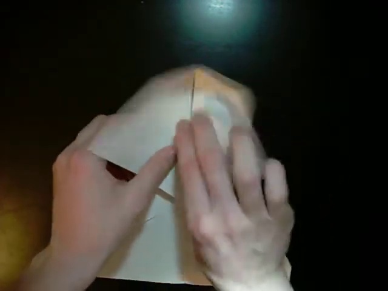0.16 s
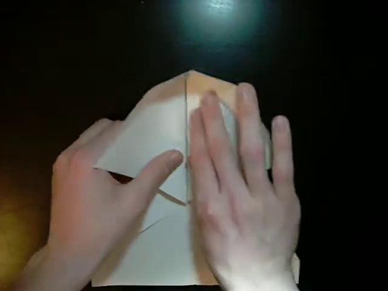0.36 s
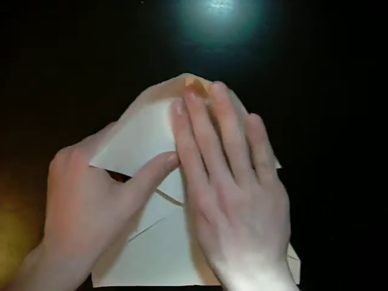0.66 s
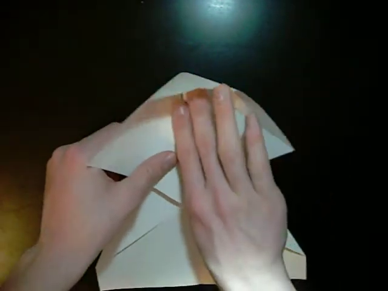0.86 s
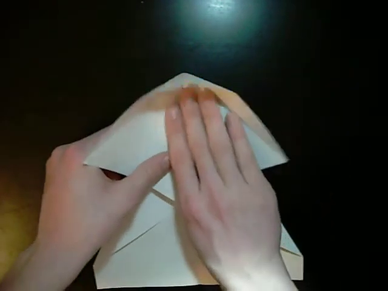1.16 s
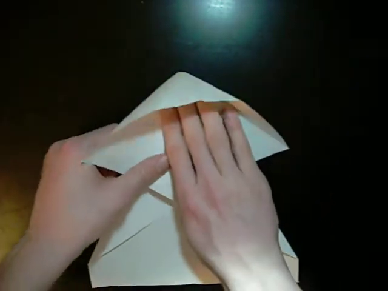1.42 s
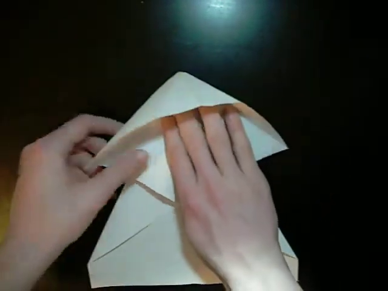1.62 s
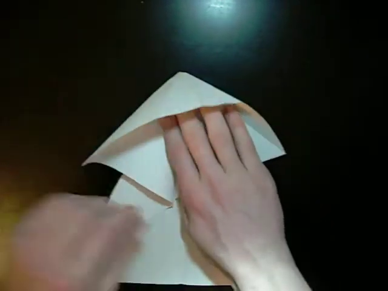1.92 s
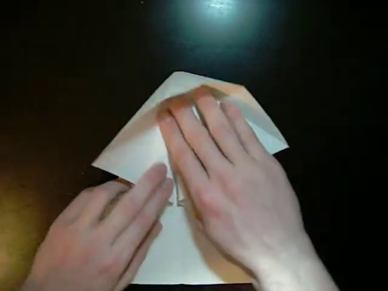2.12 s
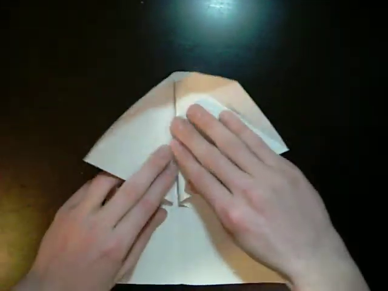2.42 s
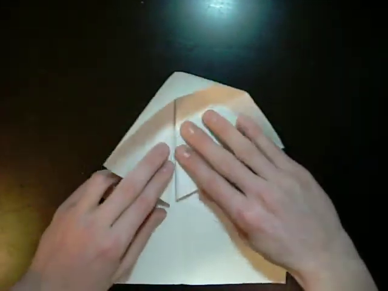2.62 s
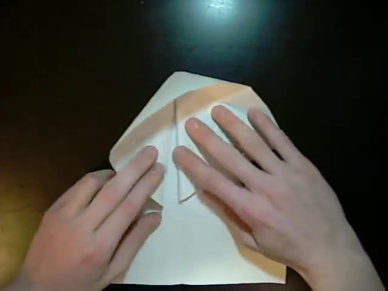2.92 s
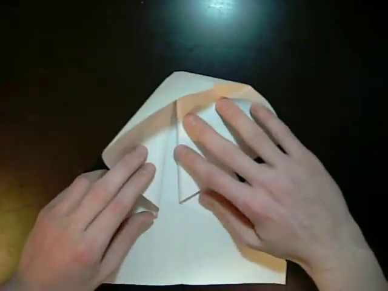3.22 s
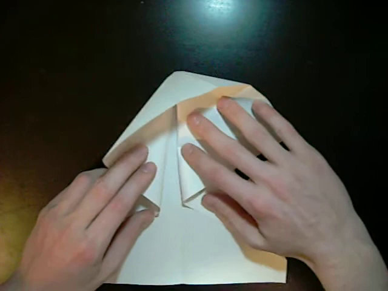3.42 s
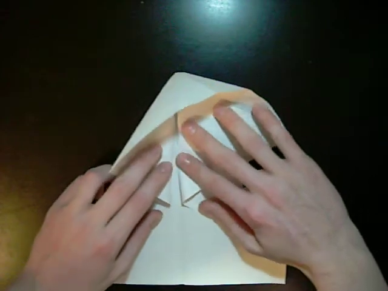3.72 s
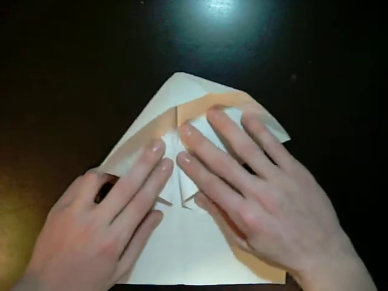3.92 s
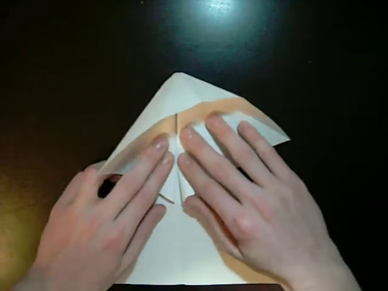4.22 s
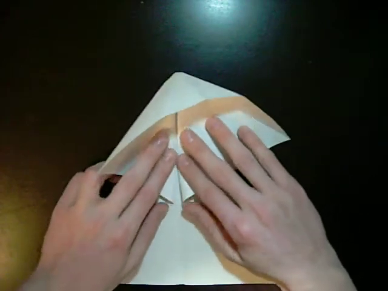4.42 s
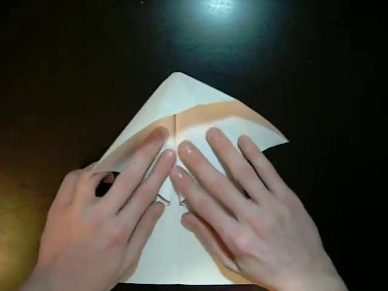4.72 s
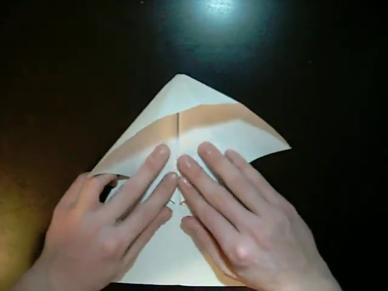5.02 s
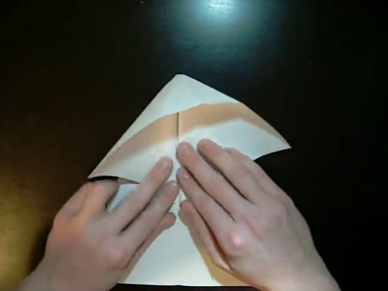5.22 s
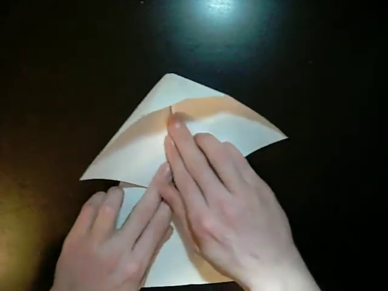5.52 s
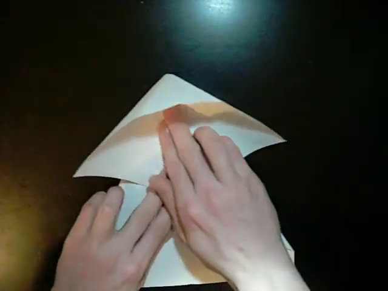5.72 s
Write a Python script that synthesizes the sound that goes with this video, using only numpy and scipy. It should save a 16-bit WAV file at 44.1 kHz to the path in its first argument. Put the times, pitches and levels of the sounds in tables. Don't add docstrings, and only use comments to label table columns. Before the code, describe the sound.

A stiff paper sheet is folded by hand on a table, heard very close through a small microphone with no high treble. It opens with a short scrape and rub; at 0.13-0.2 s the fold drags and a panel pops. Light crackles follow from 0.4 s, thickening into a cluster at 0.9-1.0 s. At about 1.38 s a very loud, clipped crack lands with a dull table knock, and a second harsh snap comes at 1.58 s amid smaller crackles. From 1.7 to 3.5 s there is mostly soft, grainy finger rustling in uneven strokes, with modest snaps near 2.04 and 2.9 s. Crisp cracks return at 3.65 s and 3.97-4.04 s, then quieter rubbing, with a small pop at 4.5 s. A final flurry of crackles comes at 5.6-5.85 s. Brief table and wall reflections follow the snaps; faint, wavering 30-per-second electric buzz and steady hiss lie underneath.

```python
import sys
import numpy as np
from scipy import signal
from scipy.fft import rfft, irfft
from scipy.io import wavfile

SR = 44100
rng = np.random.default_rng(int(sys.argv[2]) if len(sys.argv) > 2 else 0)


def generate_wav(signal):
    frames = np.transpose(np.atleast_2d(signal))
    scaled = np.clip(frames, -1, 1) * 32767
    pcm = np.round(scaled).astype(np.int16)
    wavfile.write(sys.argv[1], SR, pcm)


def amplitude_ratio(level_db):
    exponent = np.asarray(level_db, float) / 20
    return 10 ** exponent


N = 258426
BURST_T = np.arange(4096) / SR


def evened(x):
    return x / np.sqrt(np.mean(x ** 2) + 1e-20)


def colour(x, points):
    f, db = np.transpose(points)
    hz = abs(np.fft.fftfreq(4096, 1 / SR))
    gain_db = np.interp(np.log(hz + 1), np.log(f + 1), db)
    log_gain = np.log(amplitude_ratio(np.maximum(gain_db, -70)))
    phase = -signal.hilbert(log_gain).imag
    taps = np.fft.ifft(np.exp(log_gain + 1j * phase)).real[:2048]
    return signal.oaconvolve(x, taps)[:len(x)]


def resonate(x, hz, width):
    turn = np.exp(2j * np.pi * np.cumsum(hz * np.ones(len(x))) / SR)
    r = np.exp(-np.pi * width / SR)
    return 2 * (turn * signal.lfilter([1 - r], [1, -r], x / turn)).real


def slow(hz):
    spectrum = rfft(rng.standard_normal(N))
    return evened(irfft(spectrum / (1 + (np.fft.rfftfreq(N, 1 / SR) / hz) ** 2), N))


def narrow(x):
    return signal.oaconvolve(x, signal.firwin(501, 4406, window=("kaiser", 11), fs=SR), "same")


# [freq_hz, level_db_per_hz]
SHEET = [(290, -49.5), (500, -26), (549, -23.5), (940, -28), (1290, -14), (1450, -9.5), (2230, -5),
         (2420, -2), (3680, -0.5), (4110, -6.5), (4600, -31.5), (5980, -71), (10100, -120)]
# [freq_hz, level_db]
LOWER = [(150, -37.5), (400, -12.5), (800, -12.5), (1300, -5.5), (1800, -5.5), (2400, -6), (4000, -38)]


def crackle(volley, hz, low_hz, low_db):
    crack = evened(colour(volley, SHEET))
    crack = crack + evened(resonate(crack, hz, 546.4))
    body = evened(colour(volley, LOWER))
    large_panel = resonate(resonate(volley, low_hz, 480), low_hz, 1000)
    body = evened(.85 * body + evened(large_panel))
    return narrow(evened(crack) + amplitude_ratio(low_db) * body)


def snap(peak_db, hz, length, low_hz, low_db):
    noise = rng.standard_normal(len(BURST_T))
    rise = 1 - np.exp(-BURST_T / .001)
    shape = rise * np.exp(-2.2 * (BURST_T / min(length, .02)) ** 2.4)
    sound = crackle(noise * abs(noise) ** 1.7 * shape, hz, low_hz, low_db + 5.5)
    return amplitude_ratio(peak_db) * sound / abs(sound).max()


def place(events):
    out = np.zeros(N + len(BURST_T))
    for start, sound in events:
        out[round(start * SR):][:len(BURST_T)] += sound
    return out[:N]


# [time_s, peak_db, ring_hz, length_s]
CREASES = [(0.648, -24.5, 2500, 0.0041), (0.82, -26, 3030, 0.0027), (.896, -31, 3150, 0.0095),
           (1.103, -40, 3920, 0.004), (1.3771, 0.4, 2370, .008), (1.398, -18, 3100, 0.0096),
           (1.5095, -21.5, 3290, 0.0071), (1.58, -1.6, 3066, 0.0033), (1.6, -34, 2940, 0.0057),
           (1.582, -16.5, 3100, 0.0074), (1.633, -27, 3050, 0.0024), (1.72, -28, 3070, 0.021),
           (2.04, -19, 2510, 0.0078), (2.17, -27, 2780, .0039), (2.459, -31.5, 2820, 0.0065),
           (2.893, -18, 2670, 0.0055), (3.002, -31.5, 3680, .0069), (3.284, -32.5, 3240, 0.0065),
           (3.31, -37, 3160, 0.007), (3.385, -33.5, 3820, 0.0093), (3.653, -8.5, 3230, 0.0068),
           (3.903, -40, 3650, 0.005), (3.969, -4.5, 3370, 0.012), (4.012, -9, 2820, 0.0055),
           (4.042, -18.5, 3300, 0.0046), (4.159, -34.5, 3330, 0.0052), (4.284, -30.5, 3940, 0.0029),
           (4.482, -28, 3640, 0.012), (5.618, -33, 3680, .0048), (5.694, -17, 2670, 0.007)]


def creases():
    return place((s - .001, snap(db, hz, length, low_hz=2000, low_db=-24))
                 for s, db, hz, length in CREASES)


# [time_s, peak_db, length_s, low_ring_hz, low_ring_db]
BUCKLES = [(.1982, -11, 0.0058, 2250, -9.5), (0.405, -24, 0.0072, 1740, -13),
           (.546, -24.5, 0.0073, 2290, -9), (0.889, -28.5, 0.005, 2220, -6),
           (0.931, -13.5, 0.0074, 1530, -8.5), (0.953, -14.5, 0.0079, 1930, -4),
           (.964, -25.5, 0.0079, 1695, -4), (0.993, -30.5, 0.013, 2100, -5),
           (1.302, -26.5, .0053, 1320, -2), (1.3819, -5, 0.0047, 2240, -11.5),
           (1.388, -15.5, 0.0047, 2300, -6), (1.459, -21.5, 0.007, 2410, 2),
           (1.547, -27, 0.0047, 2280, -16), (1.5815, -5.5, 0.0035, 1714, -4), (1.5902, -20, .0042, 993, -2),
           (2.517, -28, 0.01, 1590, 6), (3.537, -28, 0.0078, 1410, -13), (4.199, -35, 0.0055, 1600, -9),
           (4.496, -19, 0.0075, 2240, -8), (4.604, -38.5, .0064, 1200, -3),
           (5.254, -34.5, 0.0043, 2050, -6), (5.762, -25.5, 0.0074, 1680, -10),
           (5.79, -20, 0.0053, 1935, 8), (5.8307, -22.5, 0.0028, 2350, -7)]


def buckles():
    return place((s - .001, snap(db, 3200, length, low_hz, low_db))
                 for s, db, length, low_hz, low_db in BUCKLES)


# [start_s, level_db, length_s, ring_hz, low_body_db]
DRAGS = [(0, -31, 0.02, 2900, -6.5), (0.129, -18, 0.01, 2900, -12), (.143, -14.5, 0.014, 2210, -5.5),
         (0.159, -23, 0.025, 2000, 0.5), (0.121, -30.5, 0.0092, 2500, -12),
         (0.261, -42.5, 0.035, 3480, -15), (0.408, -36, 0.026, 2890, -20.5),
         (0.645, -41.5, 0.019, 2530, -10), (0.832, -32, 0.0055, 2960, -27), (0.917, -36.5, 0.029, 3000, -8),
         (0.931, -32.5, 0.045, 2380, 7), (1.005, -38.5, 0.012, 2930, -18.5), (1.14, -46.5, 0.039, 2460, -3),
         (1.4, -32, 0.02, 3200, -20), (1.438, -35.5, 0.037, 2480, -8), (1.558, -35, 0.027, 3510, -13),
         (1.603, -45.5, 0.019, 990, 1.5), (1.782, -44, 0.014, 3180, -8), (1.835, -50, 0.023, 3130, -11),
         (1.891, -47, 0.059, 3000, -14), (3.993, -28.5, 0.022, 2800, -6), (4.105, -38, 0.023, 3170, -15),
         (5.677, -41, 0.02, 3400, -14), (5.83, -40, 0.022, 3940, -12.5)]


def drag(db, length, hz, low_db):
    noise = rng.standard_normal(len(BURST_T))
    shape = (1 - np.exp(-BURST_T / 0.0042)) * np.exp(-(BURST_T / length) ** 4)
    sound = crackle(noise * abs(noise) ** 1.2 * shape, hz, 1570, low_db + 0.5)
    return amplitude_ratio(db) * evened(sound) * np.sqrt(length / BURST_T[-1])


def drags():
    return place((s, drag(*row)) for s, *row in DRAGS)


# [start_s, peak_db, pitch_hz, t60_s]
THUMPS = [(0.134, -41.5, 148, 0.081), (0.931, -37.5, 133, 0.055), (1.38, -18.5, 90, 0.025),
          (1.378, -17.5, 243, 0.017), (1.377, -20, 902, .025), (1.382, -33, 477, 0.093),
          (2.041, -48.5, 149, 0.19), (2.898, -47, 481, .07), (3.685, -42.5, 182.6, 0.086),
          (3.69, -44, 483, 0.087), (3.97, -46.5, 182.4, 0.12), (5.341, -44.5, 120.1, 0.1),
          (5.691, -44.5, 470, 0.1)]


def thump(db, hz, t60):
    onset = 1 - np.exp(-BURST_T * hz * 2)
    return amplitude_ratio(db - 60 * BURST_T / t60) * np.sin(2 * np.pi * hz * BURST_T) * onset


def thumps():
    return place((s, thump(*row)) for s, *row in THUMPS)


# [time_s, rubbing_level_db, ring_hz]
CONTACT = [(0, -32, 3047), (0.079, -54, 2950), (0.399, -46.5, 2967), (.75, -53, 2893), (.88, -61, 2995),
           (1.05, -48.5, 3200), (1.35, -52, 2838), (1.7, -52.5, 3110), (1.85, -58.5, 3100),
           (2.3, -50.5, 2920), (3.001, -51.5, 3200), (3.149, -56, 3070), (3.4, -59.5, 3150),
           (3.749, -50, 3150), (4.402, -49, 3280), (5.02, -51, 3494), (5.5, -50, 3300), (5.86, -46, 3250)]
# [middle_s, length_s, level_db, lower_panels_db]
SWELLS = [(0.21, 0.14, -47, 8.5), (1.173, 0.077, -40, -12), (1.42, 0.14, -39, -10),
          (1.616, 0.16, -39.5, -13.5), (1.726, .08, -38.5, -9.5), (2.158, 0.091, -41, -17),
          (2.3, 0.37, -42.5, -10.5), (2.489, 0.1, -39, -8.5), (2.592, 0.17, -43.5, -10.5),
          (2.864, 0.19, -38.5, -8.5), (3.546, 0.14, -38.5, -12.5), (3.631, .03, -45, -11),
          (3.676, 0.053, -46.5, 2), (3.808, 0.13, -46, -16.5), (3.913, 0.064, -46, -21),
          (4.035, 0.11, -46.5, 2.5), (4.253, 0.1, -36, -16), (4.466, 0.065, -44.5, -10),
          (4.64, 0.08, -45, -9.5), (4.831, 0.26, -38, -28), (5.568, .1, -39.5, -26),
          (5.666, 0.11, -37.5, -22), (5.81, 0.2, -41.5, -10)]
# [start_s, length_s, level_db, lower_panels_db]
JERKS = [(0.092, 0.056, -35, -15), (0.299, 0.083, -35, -9), (0.447, 0.058, -41.5, -10.5),
         (0.512, 0.058, -33, -8.5), (0.689, 0.047, -45.5, -12), (1.211, 0.11, -42, -14),
         (1.511, 0.066, -40, -23), (1.965, 0.19, -39, -10), (2.65, 0.077, -38.5, -21.5),
         (3.002, 0.065, -40, -12.5), (3.276, 0.093, -43.5, -17), (4.149, 0.048, -41.5, -20),
         (4.453, 0.12, -39.5, -10.5), (5.102, 0.18, -41.5, -24), (5.26, 0.29, -40, -17)]


def strokes():
    t = np.arange(N) / SR
    s, level_db, ring_hz = np.transpose(CONTACT)
    panels_db = -8.5
    power = amplitude_ratio(np.interp(t, s, level_db)) ** 2 * amplitude_ratio([[0], [panels_db]]) ** 2
    for middle, length, db, low_db in SWELLS:
        shape = np.exp(-abs(2.68 * (t - middle) / length) ** 2.2)
        power = power + amplitude_ratio([[db], [db + low_db]]) ** 2 * shape
    for start, length, db, low_db in JERKS:
        u = np.maximum(t - start, 0)
        rise = (1 - np.exp(-u / 0.0037)) ** 2
        fade = np.exp(-(1.19 * u / length) ** 4.3)
        power = power + amplitude_ratio([[db], [db + low_db]]) ** 2 * rise * fade
    return *np.sqrt(power), np.interp(t, s, ring_hz)


def slips(per_s, spread_db):
    size = amplitude_ratio(spread_db * np.minimum(rng.exponential(1, N), 4))
    happens = rng.random(N) < per_s / SR
    return evened(size * rng.choice([-1., 1.], N) * happens)


def rustle():
    level, low, ring_hz = strokes()
    clumps = amplitude_ratio(.8 * slow(28) + 1.6 * slow(140))
    sheet_slips = slips(2400, 3.0) + .8 * rng.standard_normal(N)
    sheet = evened(colour(clumps * sheet_slips, SHEET))
    sheet = evened(sheet + amplitude_ratio(-2.5) * evened(resonate(sheet, ring_hz, 910)))
    panel_slips = slips(970, 3.3) + 0.84 * rng.standard_normal(N)
    panels = evened(colour(clumps * panel_slips, LOWER))
    return amplitude_ratio(-3.0) * level * sheet + amplitude_ratio(-5.0) * low * panels


# [freq_hz, width_hz, level_db]
RINGS = [(1020, 60, -3), (1160, 50, -3), (1370, 50, -3), (1700, 60, -4), (2040, 60, -3), (2420, 80, -1),
         (2860, 80, -4), (3290, 80, -2), (3720, 130, -3)]


def ringing(x):
    return sum(amplitude_ratio(db) * resonate(x, hz, width) for hz, width, db in RINGS)


# [delay_s, level_db]
ECHOES = [
    (.0045, -20.5),
    (.0068, -23.5),
    (.0105, -19.5),
    (.016, -26.5),
]


def room(x):
    taps = np.zeros(SR // 4)
    at = np.arange(300, len(taps) - 20, 20)
    at = at + rng.integers(0, 20, len(at))
    taps[at] = rng.choice([-1., 1.], len(at)) * amplitude_ratio(-60 * at / SR / 0.135)
    taps *= amplitude_ratio(-15) / np.linalg.norm(taps)
    for k, (delay, db) in enumerate(ECHOES):
        taps[round(delay * SR)] += (-1) ** k * amplitude_ratio(db)
    return signal.oaconvolve(x, taps)[:N]


# [place_cycles, height, decay_s]
KICKS = [
    (.62, -.0024, .002),
    (.81, .004, .002),
    (.81, .006, .00015),
]
HUM = [
    (2, -62, .4),
    (3, -72, .47),
]


def buzz():
    turns = 30.0 * np.arange(N) / SR
    kicks = sum(height * np.exp(-((turns - at) % 1) / 30.0 / decay) for at, height, decay in KICKS)
    hum = sum(np.sqrt(2) * amplitude_ratio(db) * np.cos(2 * np.pi * k * (turns - at)) for k, db, at in HUM)
    return amplitude_ratio(-0.3 + 1.3 * slow(14)) * (kicks - kicks.mean() + hum)


# [freq_hz, level_db_per_hz]
HISS = [(15, -17.5), (25, -2.5), (70, -2), (135, -3.5), (250, -5.5), (500, -8), (1000, -8), (2000, -24),
        (3500, -15.5), (4300, -24.5)]


def hiss():
    return amplitude_ratio(-60) * evened(colour(rng.standard_normal(N), HISS))


def scene():
    cracks = creases() + buckles() + drags() + thumps()
    rub = rustle()
    rub = rub + ringing(rub)
    paper = cracks + 0.3 * ringing(cracks) + rub
    return (paper + room(cracks + 0.24 * rub) + buzz() + hiss())[None]


def band_limit(x):
    return signal.sosfilt(signal.butter(12, 16970, fs=SR, output="sos"), x)


def record(dry):
    x = signal.sosfilt(signal.butter(2, 30, "high", fs=SR, output="sos"), dry[0])
    top = signal.oaconvolve(x, signal.firwin(201, 3950, pass_zero=False, fs=SR), "same")
    x = x + (amplitude_ratio(2.2 + 2.8 * slow(60)) - 1) * top
    mix = np.clip(narrow(x), -.72, .72)[None]
    return band_limit(mix)


dry = scene()
out = record(dry)
generate_wav(out)
```